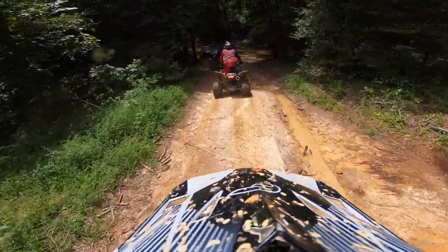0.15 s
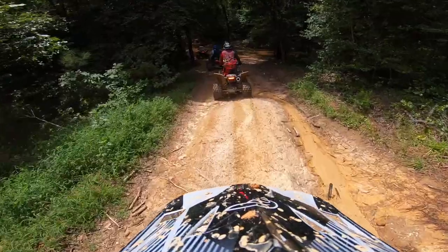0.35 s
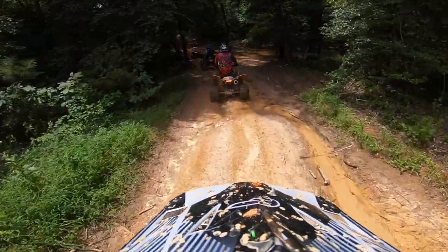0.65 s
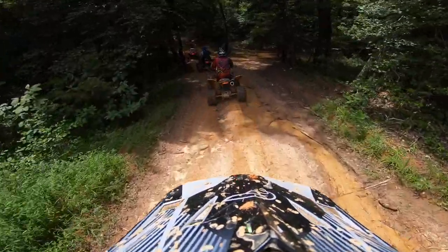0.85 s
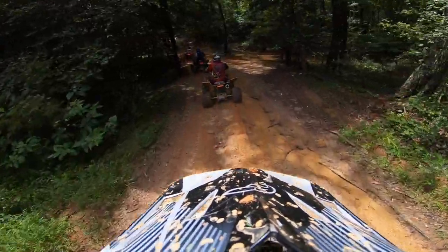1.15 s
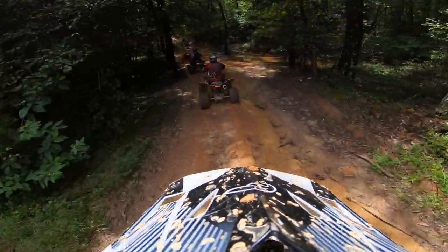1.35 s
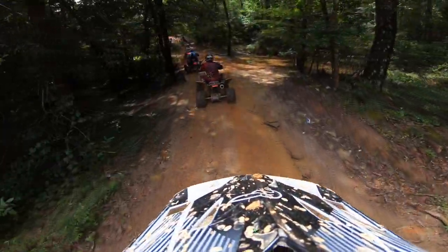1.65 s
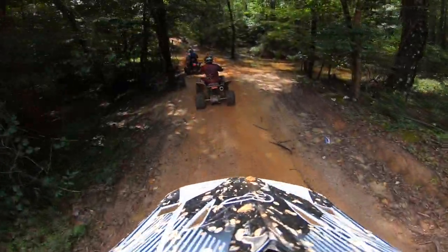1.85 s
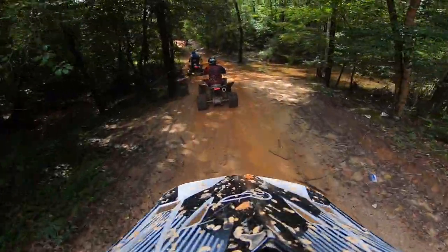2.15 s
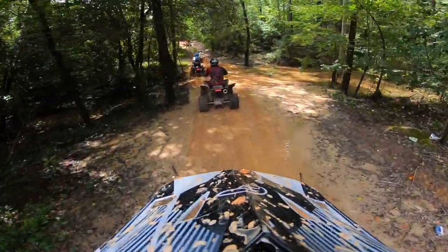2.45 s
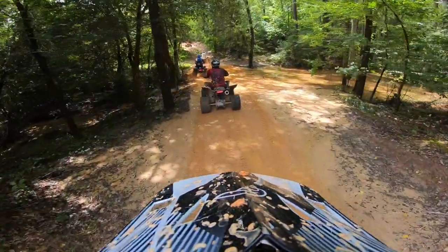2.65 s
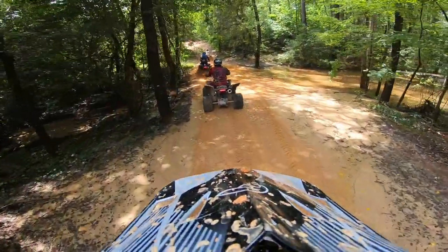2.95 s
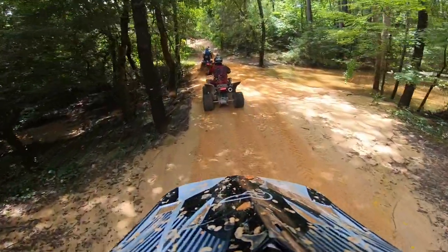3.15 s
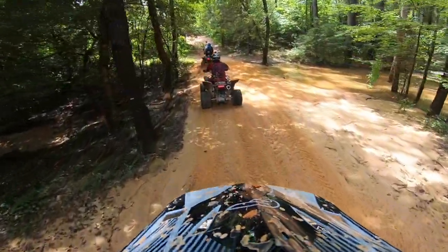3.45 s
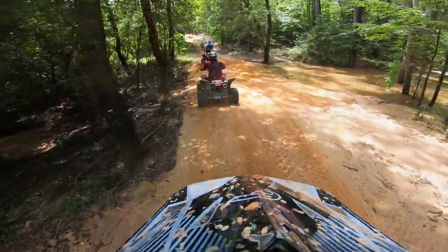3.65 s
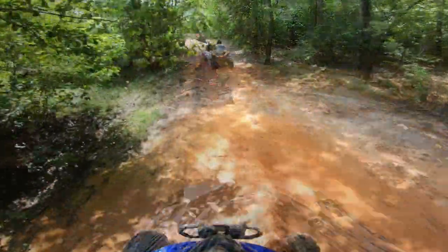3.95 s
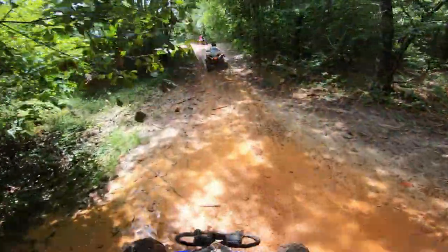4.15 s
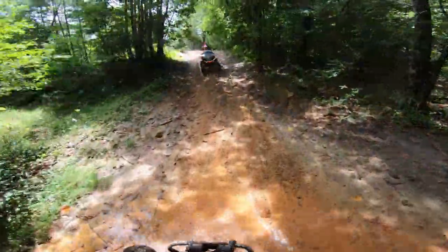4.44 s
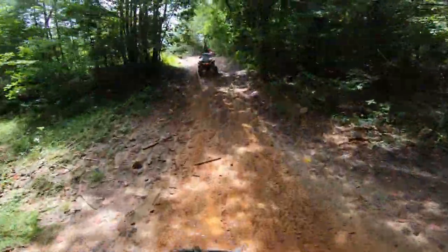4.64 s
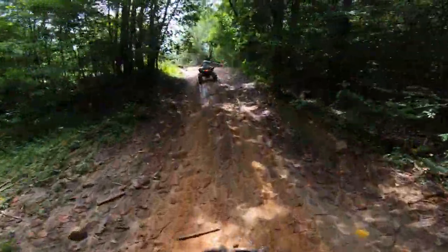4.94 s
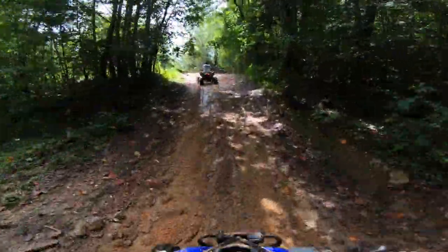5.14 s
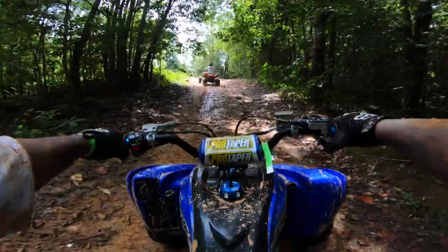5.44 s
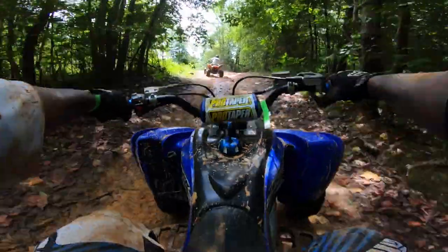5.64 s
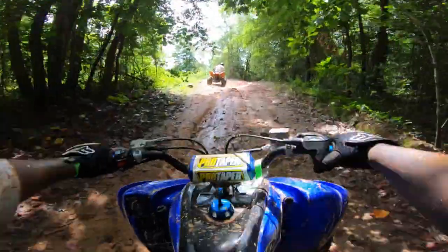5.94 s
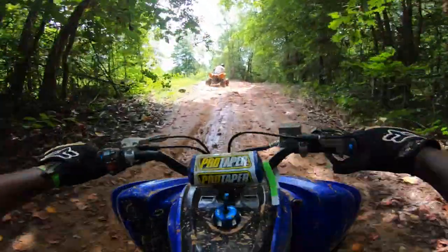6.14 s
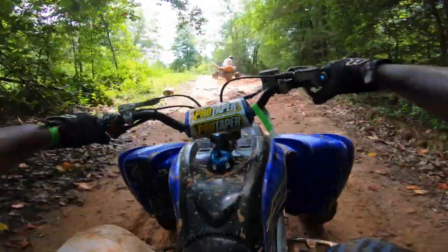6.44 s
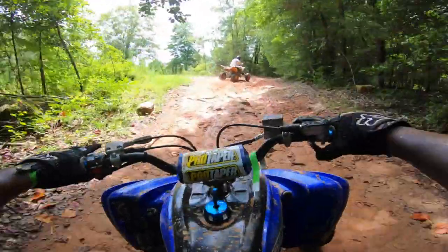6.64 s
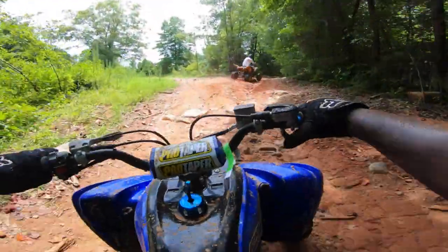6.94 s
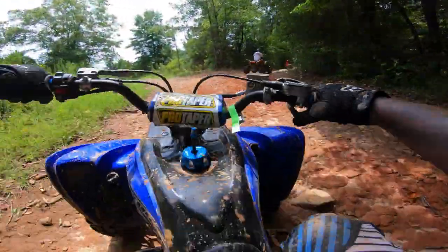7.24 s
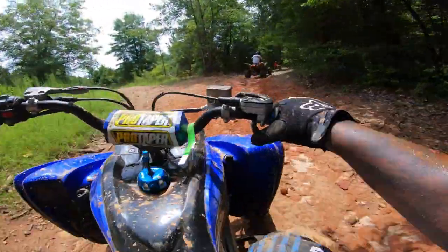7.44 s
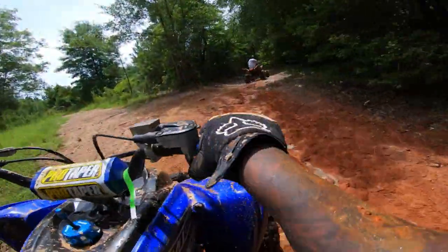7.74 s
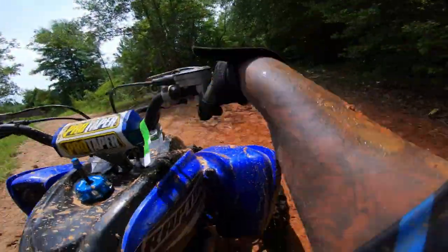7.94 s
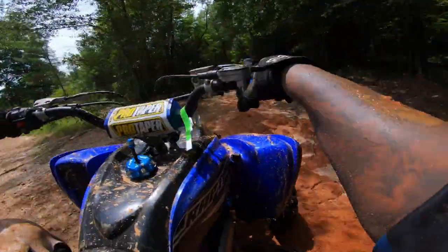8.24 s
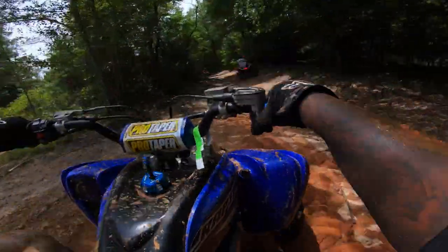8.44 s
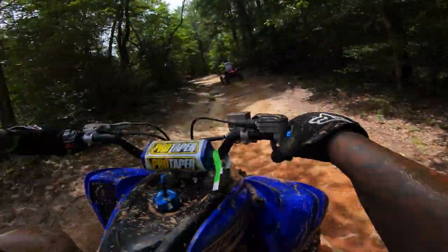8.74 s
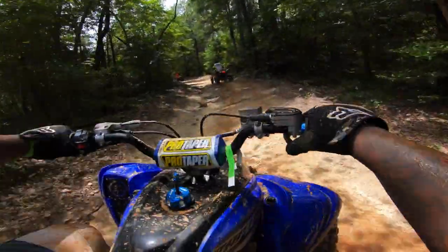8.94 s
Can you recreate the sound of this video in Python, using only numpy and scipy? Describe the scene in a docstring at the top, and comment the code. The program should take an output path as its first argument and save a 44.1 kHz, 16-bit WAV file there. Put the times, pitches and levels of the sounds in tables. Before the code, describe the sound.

Heard from a rider's helmet on a wooded dirt trail: a single-cylinder sport quad booms, muffled, beside a second lower engine and dense rumble. Its revs sag amid hard exhaust pops, then climb again. Around four seconds it cross-fades to a brighter, drier stretch with chain clatter, gritty tyre hiss and thumping exhaust, the throttle closing, then opening in cracking bursts.

```python
"""Riding a four-stroke single sport quad along a dirt trail, heard from the helmet in two stretches that cross-fade.
First, muffled: firing pulses ring the pipes of the ridden quad and of a second one over shaped-noise rumble,
with hard exhaust pops from pressure steps and bursts of gas.
Then, open and bright: dry exhaust thumps over the hiss of chain and tyres, made of ticks and shaped noise; another
quad hums up the trail, and the exhaust cracks with bursts of gas as the throttle opens on a climb."""
import sys
import numpy as np
from scipy import signal
from scipy.fft import rfft, irfft, next_fast_len
from scipy.io import wavfile
from scipy.ndimage import uniform_filter1d, minimum_filter1d, map_coordinates

SR = 44100
rng = np.random.default_rng(int(sys.argv[2]) if len(sys.argv) > 2 else 0)


def file_out(sig):
    """Save sig as 16-bit WAV at sys.argv[1]."""
    # one column per channel
    cols = np.atleast_2d(sig).T
    # limit, then scale
    lim = np.clip(cols, -1, 1)
    pcm = np.round(lim * 32767).astype(np.int16)
    wavfile.write(sys.argv[1], SR, pcm)


N = 400867
TIME = np.arange(N) / SR
SIZE = next_fast_len(N + SR // 2)
FREQ = np.maximum(np.arange(SIZE // 2 + 1) * SR / SIZE, 1)

# Engine speed of the ridden quad, muffled stretch. Each row: time in seconds, firings per second.
OWN_SPEED = [(0.0, 37.31), (0.42, 35.43), (0.58, 43.82), (0.85, 43.46), (1.1, 43.18), (1.35, 43.45),
             (1.5, 44.41), (1.65, 41.69), (1.8, 35.49), (2.0, 34.8), (2.2, 31.77), (2.34, 32.72),
             (2.5, 26.91), (2.66, 21.34), (2.85, 31.87), (3.05, 39.29), (3.22, 43.98), (3.42, 42.21),
             (3.55, 45.5), (3.95, 46.5)]
# Engine speed of the ridden quad, open stretch. Each row: time in seconds, firings per second.
CLIMB_SPEED = [(3.8, 27.89), (4.45, 28.8), (4.62, 31.64), (5.05, 30.54), (5.2, 21.81), (5.47, 24.31),
               (5.87, 24.06), (6.16, 36.87), (6.76, 39.88), (6.97, 27.91), (7.27, 30.9), (7.7, 30.95),
               (8.0, 34.0), (8.28, 34.06), (8.47, 41.11), (8.57, 35.94), (8.82, 55.5), (9.08, 56.21)]
# Throttle while picking a way up the climb. Each row: time in seconds, opening from 0 to 1.
THROTTLE = [(4.5, 0.72), (4.8, 0.33), (5.02, 0.4), (5.17, 0), (5.68, 0), (5.8, 0.26), (5.95, 0.8),
            (6.35, 0.75), (6.68, 0.56), (6.85, 0.04), (7.15, 0.65), (8.3, 0.72), (8.48, 0.75), (8.53, 0.43),
            (8.85, 0.8), (9.08, 0.82)]
OWN_START = .96  # turns: where in its cycle the ridden engine starts
# the muffled stretch gives way to the open one: (from s, to s)
FADE_OUT_S, FADE_IN_S = (3.69, 4.075), (3.73, 4.113)


def undb(db):
    """Decibels to gain."""
    return 10 ** (np.asarray(db) / 20)


def unit(x):
    """Scale to rms 1."""
    return x / np.sqrt(np.mean(x ** 2))


def power_sum(*gains):
    """Level of unrelated sounds heard together."""
    return np.sqrt(sum(g ** 2 for g in gains))


def curves(table):
    """Each column of a table, joined by straight lines in time."""
    s, *columns = np.transpose(table)
    return [np.interp(TIME, s, c) for c in columns]


def fade(span):
    """Rise from 0 to 1 between two times."""
    return np.interp(TIME, span, [0, 1])


def noise():
    """White noise."""
    return rng.standard_normal(N)


def walk(rate):
    """Random points, `rate` a second, joined by straight lines; rms 1."""
    points = rng.standard_normal(4096)
    return unit(np.interp(TIME * rate, np.arange(len(points)), points))


def colour(x, points):
    """Filter by a spectrum of (Hz, dB) points."""
    hz, db = np.transpose(points)
    response = undb(np.interp(np.log(FREQ), np.log(hz), db))
    return irfft(rfft(x, SIZE) * response, SIZE)[:N]


def ring(x, modes, low_hz, high_hz):
    """Damped resonances, with steep skirts below and above them."""
    response = sum(undb(db) / (1 + 1j * (FREQ - hz ** 2 / FREQ) / width) for hz, width, db in modes)
    skirts = 1 / np.sqrt((1 + (low_hz / FREQ) ** 6) * (1 + (FREQ / high_hz) ** 6))
    return irfft(rfft(x, SIZE) * response * skirts, SIZE)[:N]


def echo(x, lag, gain):
    """Add one delayed reflection."""
    return x + gain * np.interp(TIME - lag, TIME, x, left=0)


def drift(x, share, rate):
    """Let all the pitches of a sound wander together."""
    return map_coordinates(x, [np.cumsum(1 + share * walk(rate))], mode="mirror")


def firings(speed, start, scatter_db, jitter):
    """One pulse a cycle, each with its own strength and a slight slip in time; equal power at any speed."""
    hz, = curves(speed)
    turns = start + np.cumsum(hz) / SR
    times = np.interp(np.arange(1, int(turns[-1]) + 1), turns, TIME)
    chance = rng.standard_normal((len(times), 2))
    slipped = times + jitter * chance[:, 0]
    at = np.clip((slipped * SR).astype(int), 0, N - 1)
    strength = undb(scatter_db * chance[:, 1]) / np.sqrt(hz[at])
    return np.bincount(at, strength, N)


def puffs(pulses, decay, lead):
    """Turbulent gas that bursts out as the valve opens, just ahead of each pulse's peak."""
    age = TIME[:SR // 20] / decay
    gate = signal.fftconvolve(pulses, age * np.exp(-age))[:N]
    return noise() * np.interp(TIME + lead, TIME, gate)


def rasp(gas, hz, width_hz):
    """Gas rings one steep resonance of the silencer."""
    b, a = signal.iirpeak(hz, hz / width_hz, fs=SR)
    once = signal.lfilter(b, a, gas)
    return unit(signal.lfilter(b, a, once))


def muffled_quads():
    """Two engines boom through their pipes over the rumble of air and ground; the ridden one revs, growls and rasps."""
    # Engine speed of the second quad. Each row: time in seconds, firings per second.
    other_speed = [(0.0, 24.96), (0.3, 27.18), (0.75, 25.61), (1.2, 24.25), (1.55, 23.92), (1.95, 26.04),
                   (2.1, 23.01), (2.5, 19.7), (2.7, 21.02), (3.15, 21.78), (3.4, 24.92), (3.65, 28.21),
                   (3.9, 25.12)]
    # Resonances of pipes and silencers. Each row: centre in Hz, width in Hz, relative level in dB.
    own_pipe = [(83, 89, -9.5), (159.6, 54, 10), (253, 72, -1.5)]
    other_pipe = [(74, 24, 6), (116, 260, -5), (168.6, 31, 3.5)]
    body_modes = [(254, 30, 1), (317.5, 40, 9), (356, 20, 0)]
    growl_modes = [(463, 76, 9.5), (513, 130, -4.5), (634, 130, -8.5)]
    # Spectra of rumble and tyre hiss. Each row: frequency in Hz, relative level in dB.
    rumble_colour = [(20, -12.5), (45, -19), (54, -16), (70, 2), (170, 3.5), (260, -2.5), (380, -8),
                     (470, -20), (900, -35), (2000, -76)]
    hiss_colour = [(300, 12.5), (800, 15.5), (1700, 8.5), (2500, 0.5), (3500, -2), (5000, -4),
                   (5900, -15.5), (8000, -21), (10000, -38), (15000, -44.5)]
    # Gain on the ridden quad's boom, which stands out as it runs down with the throttle shut.
    # Each row: time in seconds, gain in dB.
    overrun = [(1.4, -6), (1.62, -3.5), (1.85, -5), (2.22, 5.5), (2.31, 4), (2.45, 2), (2.65, 3),
               (2.8, 2.5)]
    # Gain on rumble, hiss (half as many dB) and second quad, dipping briefly after the hardest pops.
    # Each row: time in seconds, gain in dB.
    lull_rows = [(2.24, 6), (2.275, -7), (2.33, -3), (2.39, 0.5), (2.6, 1), (2.75, 2.5)]
    # Tyre hiss before the lull gain. Each row: time in seconds, level in dB.
    tyre_rows = [(0, -31.5), (.17, -39), (.5, -41), (.95, -38), (1.5, -39), (1.75, -41), (2.15, -36.5),
                 (2.8, -39.5), (3.7, -38)]
    # levels at one engine speed (firings per second), before the gains above, and their growth with revs
    boom_db, rumble_db, at_hz = -20, -19, 41
    boom_db_per_hz, rumble_db_per_hz = 0.24, 0.22
    other_db = -22.5  # second quad cruising alongside, before the lull gain

    body_gain, growl_gain, rasps = surges()
    revs = curves(OWN_SPEED)[0] - at_hz
    lull = undb(curves(lull_rows)[0])
    own = firings(OWN_SPEED, start=OWN_START, scatter_db=1., jitter=.00008)
    other = firings(other_speed, start=.17, scatter_db=1., jitter=.0001)
    own_gain = undb(boom_db + boom_db_per_hz * revs + curves(overrun)[0])
    boom = own_gain * unit(ring(-own, own_pipe, low_hz=60, high_hz=240))
    boom += lull * undb(other_db) * unit(ring(-other, other_pipe, low_hz=54, high_hz=262))
    body = unit(ring(-own - 0.35 * other, body_modes, low_hz=238, high_hz=382))
    flow = .7 * noise() - unit(own)
    growl = unit(ring(flow, growl_modes, low_hz=434, high_hz=734))
    rumble = lull * unit(colour(noise(), rumble_colour)) * undb(0.98 * walk(21.96))
    # each firing knocks the silencer and sends a burst of gas through it
    gas = unit(own) + .25 * unit(puffs(own, decay=.0012, lead=.001)) + .35 * noise()
    engines = boom + undb(rumble_db + rumble_db_per_hz * revs) * rumble
    engines += body_gain * body + growl_gain * growl
    engines += sum(gain * rasp(gas, hz, width_hz) for gain, hz, width_hz in rasps)
    hiss = unit(colour(noise(), hiss_colour)) * undb(0.88 * walk(25.04))
    tyres = np.sqrt(lull) * undb(curves(tyre_rows)[0]) * hiss
    return (engines + tyres) * (1 - fade(FADE_OUT_S))


def surges():
    """Throttle surges swell and ebb over the cruise; gives body and growl gains, and each rasp's gain, pitch, width."""
    # Each row: peak in seconds, half-length in seconds, exhaust body in dB, growl in dB, rasp in dB,
    # rasp pitch in Hz, rasp width in Hz.
    surge_rows = [(0.018, 0.041, -44, -45, -43.5, 2390, 600), (0.043, 0.14, -41, -45, -57, 1280, 300),
                  (.949, 0.23, -27.5, -40, -43.5, 1290, 280), (1.365, 0.19, -25, -34, -34.5, 1230, 328),
                  (1.975, 0.17, -28, -36, -48, 1180, 295), (3.218, 0.047, -30, -24, -31.5, 1550, 553),
                  (3.69, 0.21, -26.5, -28, -40.5, 1400, 566)]
    # between the surges
    cruise_body_db, cruise_growl_db, cruise_rasp_db = -43.5, -42, -53.5
    cruise_rasp_hz, cruise_rasp_width_hz = 1460, 410

    peak, half, body_db, growl_db, rasp_db, hz, width_hz = np.transpose(surge_rows)[:, :, None]
    swell = np.exp(-.5 * ((TIME - peak) / half) ** 2)
    body = power_sum(undb(cruise_body_db), *(swell * undb(body_db)))
    growl = power_sum(undb(cruise_growl_db), *(swell * undb(growl_db)))
    cruise = (undb(cruise_rasp_db), cruise_rasp_hz, cruise_rasp_width_hz)
    return body, growl, [cruise, *zip(swell * undb(rasp_db), hz[:, 0], width_hz[:, 0])]


def pops():
    """Over-strong firings: a pressure step thumps the pipe and, with a short burst of gas, cracks in the silencer."""
    # Each row: time in seconds, crack level in dB, body level in dB.
    pop_rows = [(.186, -23.5, -8), (1.211, -20, -20), (1.371, -20.5, -19), (1.485, -27, -12),
                (1.531, -27, -24), (2.046, -21.5, -12), (2.09, -16, -7), (2.18, -24, -22), (2.212, -10, 3),
                (2.2447, -14.5, -1.5), (2.307, -24, -28), (2.338, -24.5, -23), (2.37, -15.5, -15),
                (2.401, -20.5, -12), (2.435, -23, -23), (2.47, -25.5, -28), (3.505, -26, -13),
                (3.724, -34, -12)]
    # What a pop rings, high in the silencer and low in the pipe.
    # Each row: centre in Hz, width in Hz, relative level in dB.
    crack_modes = [(940, 1200, 12.5), (1430, 120, 8.5), (2050, 100, -30.5), (2750, 200, -15.5)]
    body_modes = [(168, 88, 7.5), (385, 310, 5.5), (650, 280, -2.5)]

    s, crack_db, body_db = np.transpose(pop_rows)
    cracks, thumps = (np.bincount((s * SR).astype(int), undb(db), N) for db in (crack_db, body_db))
    crack = ring(cracks, crack_modes, low_hz=700, high_hz=2730)
    gas = ring(puffs(cracks, decay=.0018, lead=.0003), crack_modes, low_hz=700, high_hz=2700)
    body = ring(-thumps, body_modes, low_hz=90, high_hz=910)
    sharp = undb(crack_db.max()) * (crack + gas / 3) / np.abs(crack).max()
    return sharp + undb(body_db.max()) * body / np.abs(body).max()


def open_exhaust():
    """Each firing is a short thump and a pipe drone with a scattered tail; an open throttle adds crack and bark."""
    # Pipe resonances. Each row: centre in Hz, width in Hz, relative level in dB.
    drone_modes = [(81.3, 33, -24), (108, 55, 0), (166, 40, 25), (200, 290, -5)]
    thump_modes = [(279, 140, 7), (375, 160, 9.5), (497, 39, 4), (720, 37, -10)]
    # Spectra of crack and bank scatter. Each row: frequency in Hz, relative level in dB.
    crack_colour = [(300, -10), (800, -5), (1400, 4.5), (2000, -3), (2900, -1.5), (4000, -6.5),
                    (6000, -5.5), (10000, -11), (15000, -20)]
    bank_colour = [(100, -15.5), (300, -6.5), (520, 1.5), (750, -6.5), (1050, -6.5), (1300, -16.5),
                   (4000, -27.5)]
    # Exhaust scattered back by the trail banks. Each row: time in seconds, dB relative to the direct thump.
    banks = [(4.1, 5), (4.45, 7.5), (5.0, -4), (6.0, -12.5), (6.7, -12), (7.2, 0.5), (7.8, 3), (8.4, -7.5)]
    # levels with the throttle shut, and how much each rises when it is wide open
    thump_db, thump_rise_db = -51, 22
    drone_db, drone_rise_db = -46.5, 6
    crack_db, crack_rise_db = -68, 17
    best_hz, range_hz = 38, 9.7  # the pipe drones best near one engine speed, in firings per second
    stab_drone_db = -15.5  # relative to the stab's thump

    opening, = curves(THROTTLE)
    stab_thump, stab_crack, barks = stabs()
    off_best = (curves(CLIMB_SPEED)[0] - best_hz) / range_hz
    thump_gain = power_sum(undb(thump_db + thump_rise_db * opening), stab_thump)
    steady_drone = undb(drone_db + drone_rise_db * opening) / np.hypot(1, off_best ** 2)
    drone_gain = power_sum(steady_drone, undb(stab_drone_db) * stab_thump)
    crack_gain = power_sum(undb(crack_db + crack_rise_db * opening), stab_crack)
    scattered = undb(curves(banks)[0])
    pulses = firings(CLIMB_SPEED, start=0, scatter_db=.8, jitter=.00006)
    thump = unit(ring(echo(-pulses, lag=0.007, gain=-0.023), thump_modes, low_hz=192, high_hz=550))
    drone = unit(ring(-pulses, drone_modes, low_hz=69.4, high_hz=240))
    crack = unit(colour(puffs(pulses, decay=0.0011, lead=0.0011), crack_colour))
    bark = sum(gain * rasp(-pulses, hz, width_hz=164) for gain, hz in barks)
    tail = unit(colour(puffs(pulses, decay=0.009, lead=0.0037), bank_colour))
    # the more is scattered, the softer the direct thump
    sound = thump_gain * (thump + scattered * tail) / np.hypot(1, scattered)
    sound += drone_gain * drone + crack_gain * crack + bark
    return sound * fade(FADE_IN_S)


def stabs():
    """Throttle stabs rise fast, hold and die away; gives thump and crack gains, and a bark gain and pitch per stab."""
    # Each row: start in seconds, hold in seconds, thump in dB, crack in dB, bark in dB, bark pitch in Hz.
    stab_rows = [(5.755, 0.0048, -38, -55, -55, 450), (5.998, 0.25, -31.5, -33.5, -35.5, 500),
                 (8.357, 0.12, -29.5, -34.5, -37.5, 503), (8.629, 0.16, -26.5, -29, -42.5, 363)]
    attack_s, release_s = 0.016, 0.033

    start, hold, thump_db, crack_db, bark_db, hz = np.transpose(stab_rows)[:, :, None]
    before = np.maximum(start - TIME, 0)
    after = np.maximum(TIME - start - hold, 0)
    shape = np.exp(-before / attack_s - after / release_s)
    thump, crack = (np.sum(shape * undb(db), axis=0) for db in (thump_db, crack_db))
    return thump, crack, zip(shape * undb(bark_db), hz[:, 0])


def snaps():
    """A hard firing on the climb shoots a jet of gas that rings the silencer for a few milliseconds."""
    # Each row: time in seconds, peak in dB, ring in Hz, ring width in Hz.
    snap_rows = [(6.0256, -15.5, 2630, 2520), (6.0865, -18, 3700, 1300), (6.1145, -19, 3770, 1300),
                 (6.1703, -15.5, 3300, 900), (8.359, -26, 1400, 1500), (8.3862, -16.5, 1350, 1500),
                 (8.4127, -25, 1300, 1400), (8.4376, -12.5, 1400, 1500), (8.462, -19, 1300, 1200),
                 (8.6191, -10.5, 2740, 1300), (8.6446, -15, 2870, 3500), (8.6671, -11, 2920, 3510),
                 (8.6894, -8.5, 3480, 3200), (8.7105, -13, 2600, 1490), (8.732, -10, 4200, 4500),
                 (8.7519, -8, 3000, 2400), (8.7708, -4.5, 2930, 805), (8.8447, -13.5, 2750, 900)]
    decay_s = .0008
    out, age = np.zeros(N), TIME[:SR // 30] / decay_s
    for s, db, hz, width_hz in snap_rows:
        jet = rng.standard_normal(len(age)) * age * np.exp(-age)
        snap = rasp(jet, hz, width_hz)
        at = int(s * SR)
        out[at:at + len(age)] += undb(db) * snap / np.abs(snap).max()
    return out


def pipe_notes():
    """The ridden quad's pipe locks onto one multiple of the firing rate and sings clean tones that swell and ebb."""
    # Each row: peak in seconds, half-length in seconds, multiple of the firing rate, level in dB.
    notes = [(1.151, 0.2, 7, -27), (1.394, 0.061, 8, -22), (1.605, 0.14, 4, -13), (1.921, 0.07, 5, -21.5),
             (2.38, 0.052, 5, -18.5), (2.47, 0.091, 4, -18.5), (2.567, 0.15, 3, -15),
             (4.723, 0.15, 5, -46.5), (6.82, 0.083, 5, -50), (8.154, 0.14, 5, -49), (8.84, 0.26, 5, -41),
             (8.95, 0.14, 2, -40), (8.955, 0.18, 7, -41), (8.95, 0.12, 6, -52)]
    peak, half, multiple, db = np.transpose(notes)[:, :, None]
    own, climb = (np.cumsum(curves(speed)[0]) / SR for speed in (OWN_SPEED, CLIMB_SPEED))
    turns = np.where(TIME < CLIMB_SPEED[0][0], OWN_START + own, climb)
    swell = np.exp(-.5 * ((TIME - peak) / half) ** 2)
    return -np.sum(swell * undb(db) * np.cos(2 * np.pi * np.round(multiple) * turns), axis=0)


def running_gear():
    """Dense chain and valve ticks ring the engine casing; the chain whines; knobbly tyres throw hissing grit."""
    # Rolling over smooth and stony ground, before the mix gains below.
    # Each row: time in seconds, chain and engine clatter in dB, grit hiss in dB.
    roll = [(3.98, -30.5, -43.5), (4.22, -40, -49.5), (4.7, -34.5, -47), (5.24, -32, -43),
            (5.44, -27, -35.5), (5.55, -30.5, -39.5), (5.9, -30.5, -41.5), (6.17, -27, -37),
            (6.5, -29.5, -40), (6.7, -29, -37.5), (6.93, -37, -45), (7.05, -32, -40), (7.22, -32.5, -41),
            (7.33, -37.5, -43.5), (7.56, -38, -48.5), (7.82, -29, -39.5), (8.1, -35.5, -45),
            (8.55, -32, -41.5), (8.72, -27, -35), (8.92, -29.5, -39.5)]
    # Engine casing resonances. Each row: centre in Hz, width in Hz, relative level in dB.
    casing_modes = [(735, 120, 2.5), (983, 29, 1), (1760, 100, -4), (2480, 22, -16), (2510, 33, -2.5),
                    (2618, 20, 2.5), (2990, 55, -1), (3110, 53, -3.5), (3337, 90, -5), (4240, 15, 0.5),
                    (4350, 46, -5), (4600, 100, -19), (7440, 83, -7), (11350, 60, -6.5)]
    # Spectra of clatter and grit. Each row: frequency in Hz, relative level in dB.
    clatter_colour = [(25, -38), (60, -6), (150, 2), (400, 3), (800, -1), (1200, 2.5), (2100, -1),
                      (2800, 3), (3800, -3), (5200, -2.5), (7000, -9.5), (12000, -32)]
    grit_colour = [(2000, -13), (5000, -9.5), (7000, 4), (9500, 4.5), (12000, 1), (14000, -1), (15800, -8)]
    # the casing rings more as the throttle shuts and the chain runs slack
    casing_db, casing_slack_db = -8.5, 2.5
    # the tank mirrors the sound; the delay sways as the rider moves
    tank_lag_s, tank_sway, tank_gain = 0.001192, 0.043, 0.13

    clatter_db, grit_db = curves(roll)
    slack = 1 - curves(THROTTLE)[0]
    strength = np.minimum(rng.exponential(size=N), 6)
    ticks = noise() * undb(2.6 * strength)
    casing = unit(ring(ticks * undb(2.0 * walk(160)), casing_modes, low_hz=487, high_hz=13000))
    casing = drift(casing, share=.004, rate=3)
    clatter = unit(colour(noise(), clatter_colour)) * undb(1.35 * walk(130) + 1.0 * walk(7))
    grit = unit(colour(noise(), grit_colour)) * undb(1.66 * walk(190) + 0.45 * walk(10))
    # in the stabs of throttle the exhaust takes over part of the treble
    crack_gain = stabs()[1]
    share = 1 / np.hypot(1, 0.1 * crack_gain / undb(clatter_db))
    metal = undb(casing_db + casing_slack_db * slack) * casing + undb(-1.5) * clatter
    sound = undb(clatter_db) * metal + undb(grit_db + 2.04) * grit
    sound = echo(sound, lag=tank_lag_s * (1 + tank_sway * walk(2.4)), gain=tank_gain)
    return (share * sound + whines()) * fade(FADE_IN_S)


def whines():
    """Rubbing metal of chain and brakes sings in rough, wandering bands that swell, glide and fade."""
    # Each row: peak in seconds, half-length in seconds, pitch in Hz, glide in Hz per second, level in dB.
    whine_rows = [(4.681, .16, 1695, 48.5, -41.5), (5.051, 0.14, 3380, -350, -39.5),
                  (5.153, .17, 1520, -550, -40.5), (5.201, 0.17, 4350, 301, -41),
                  (5.359, 0.41, 2507, -100, -41), (5.4, .1, 996, 250, -39), (5.5, .25, 1760, 100, -42),
                  (6.1, .55, 3286, -1.5, -40), (6.6, 0.11, 4430, 300.5, -42),
                  (6.737, 0.097, 2860, -1200, -38), (7.881, .1, 2620, 0, -38)]
    out = 0
    for peak, half, hz, glide, db in whine_rows:
        pitch = (hz + glide * (TIME - peak)) * (1 + .008 * walk(13))
        phase = 2 * np.pi * np.cumsum(pitch) / SR
        width = .04 * hz  # Hz: rate of the random wobble that roughens the tone
        band = unit(walk(width) * np.sin(phase) + walk(width) * np.cos(phase))
        swell = np.exp(-.5 * ((TIME - peak) / half) ** 2)
        out = out + swell * undb(db) * band / np.sqrt(2)
    return out


def quad_ahead():
    """A quad further up the trail: only the low hum of its pipe carries back."""
    # Each row: time in seconds, firings per second, level in dB.
    ahead = [(4, 36, -39), (4.4, 40, -54), (5, 45, -55), (5.2, 47, -46.5), (5.45, 43, -43), (5.65, 48, -49),
             (6.4, 40, -55), (6.9, 34, -46.5), (7.18, 30, -49), (7.5, 35, -50), (7.801, 39, -41.5),
             (8.1, 41, -62), (8.6, 38, -42)]
    # Its pipe, heard from afar. Each row: centre in Hz, width in Hz, relative level in dB.
    ahead_pipe = [(84, 97, -4), (234, 59, -12)]
    pulses = firings([row[:2] for row in ahead], start=0, scatter_db=.8, jitter=.0001)
    hum = unit(ring(-pulses, ahead_pipe, low_hz=55, high_hz=260))
    return undb(curves(ahead)[1]) * hum * fade(FADE_IN_S)


def scene():
    """All sources at the helmet."""
    ridden = muffled_quads() + pops() + open_exhaust() + snaps() + pipe_notes()
    return (ridden + running_gear() + quad_ahead())[None]


def record(dry):
    """A limiter at the microphone holds the loudest peaks down; the top is cut."""
    top_hz = 15750
    gain = np.minimum(1, undb(-2.0) / (np.abs(dry) + 1e-9))
    gain = uniform_filter1d(minimum_filter1d(gain, size=200), size=200)
    low_pass = signal.ellip(10, .2, 80, top_hz, fs=SR, output="sos")
    return signal.sosfilt(low_pass, dry * gain)


dry = scene()
out = record(dry)
file_out(out)
```